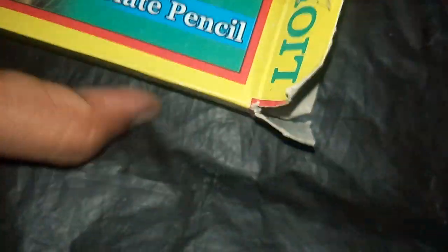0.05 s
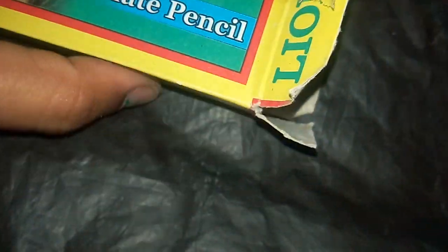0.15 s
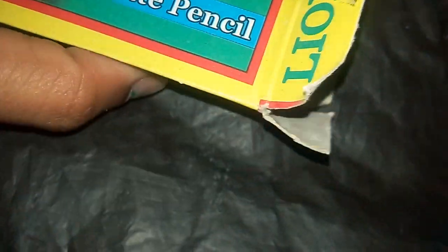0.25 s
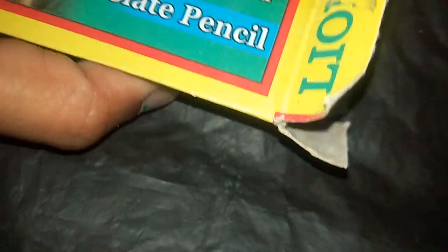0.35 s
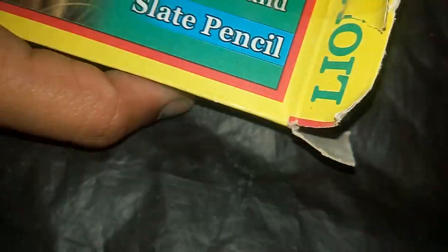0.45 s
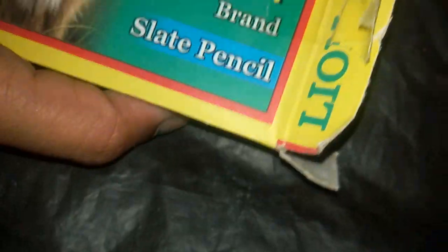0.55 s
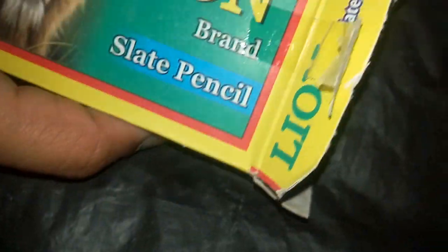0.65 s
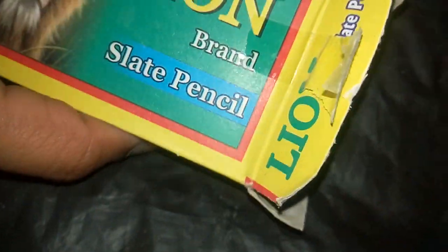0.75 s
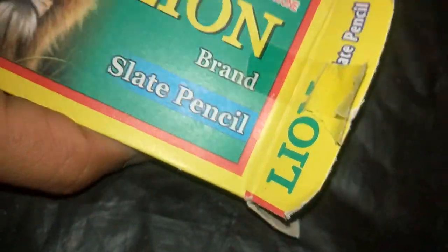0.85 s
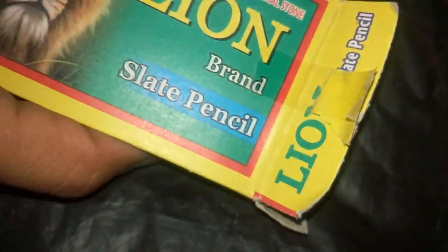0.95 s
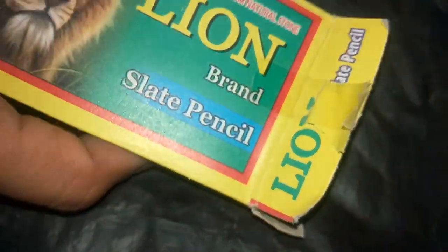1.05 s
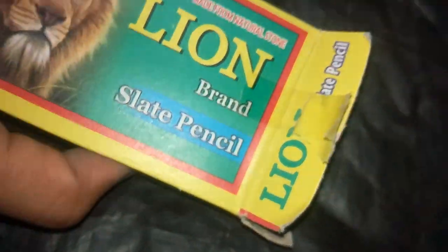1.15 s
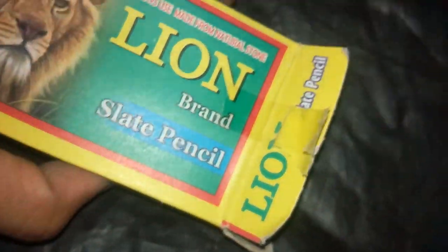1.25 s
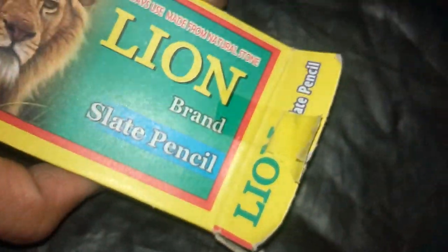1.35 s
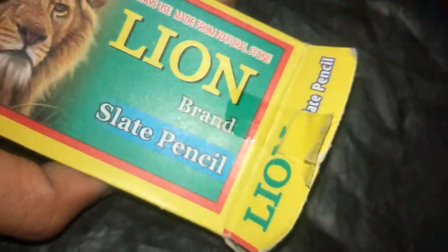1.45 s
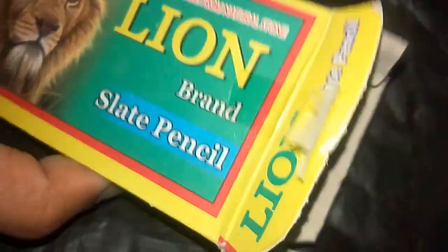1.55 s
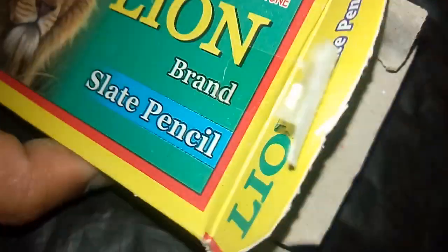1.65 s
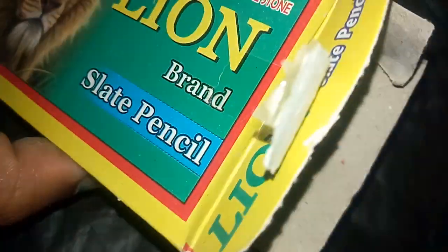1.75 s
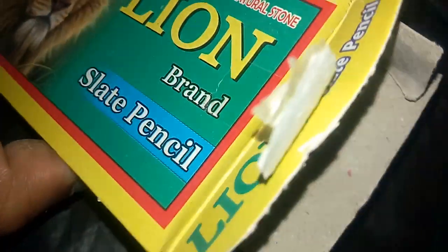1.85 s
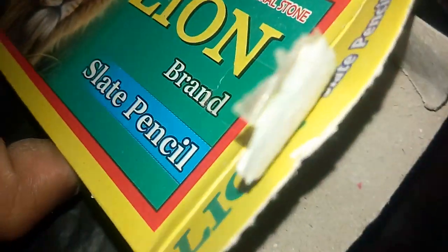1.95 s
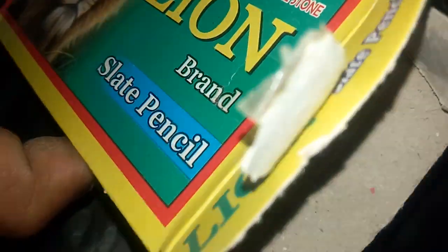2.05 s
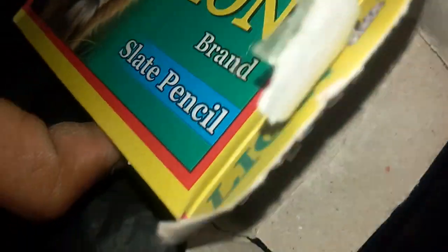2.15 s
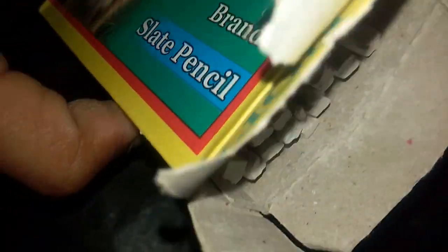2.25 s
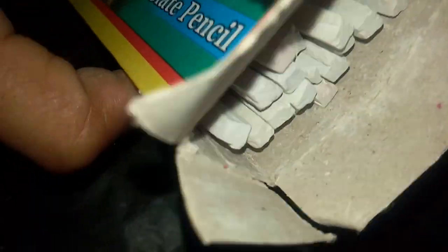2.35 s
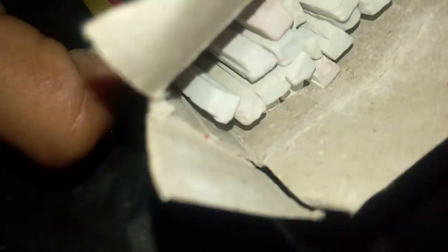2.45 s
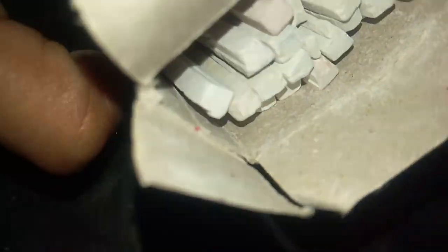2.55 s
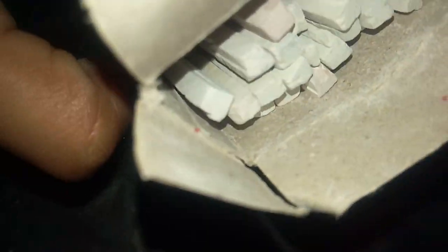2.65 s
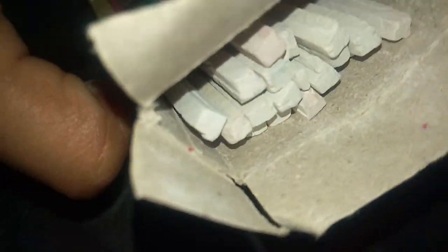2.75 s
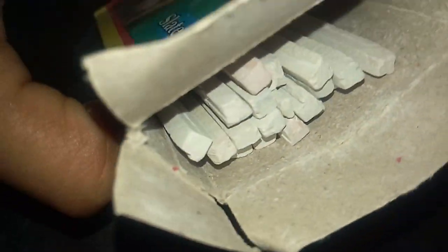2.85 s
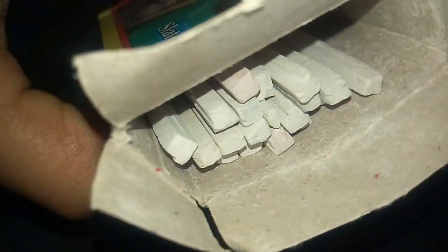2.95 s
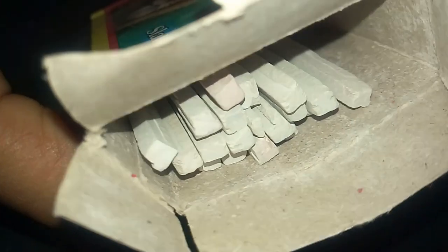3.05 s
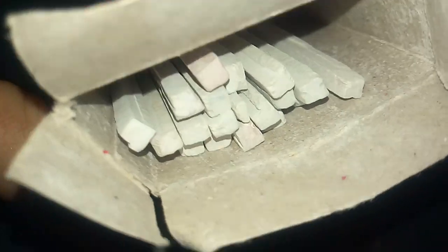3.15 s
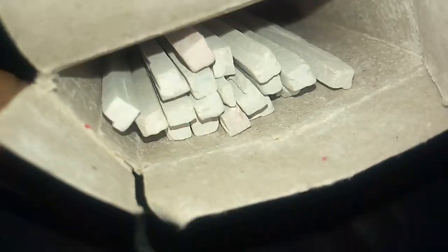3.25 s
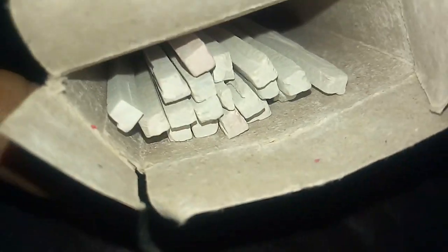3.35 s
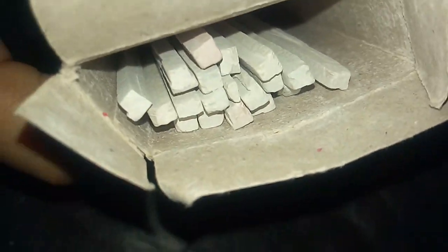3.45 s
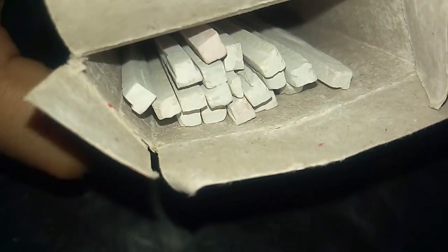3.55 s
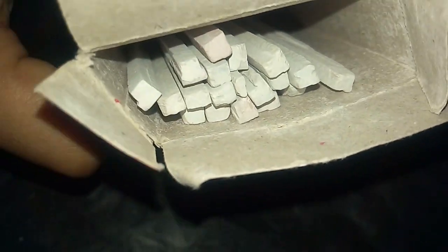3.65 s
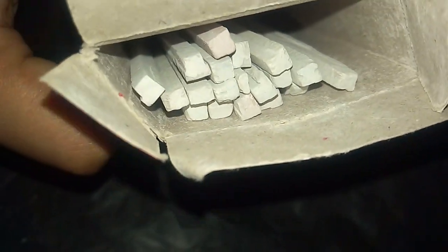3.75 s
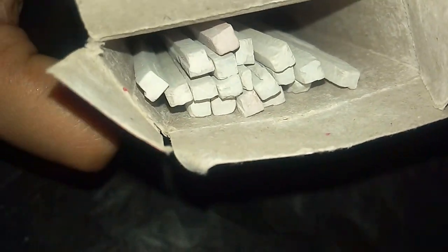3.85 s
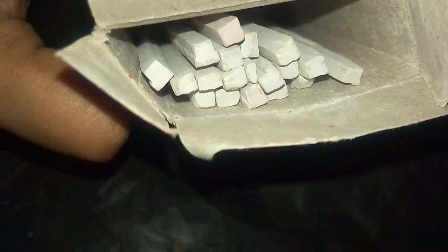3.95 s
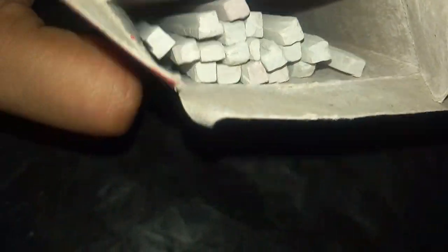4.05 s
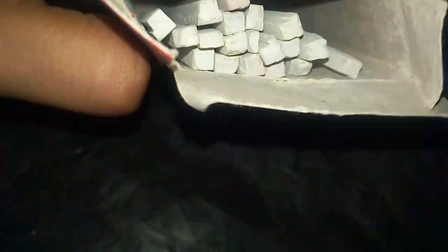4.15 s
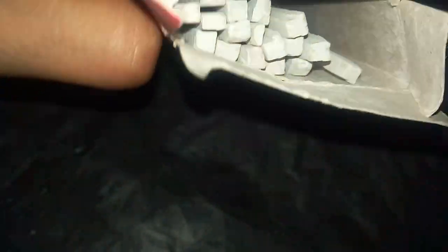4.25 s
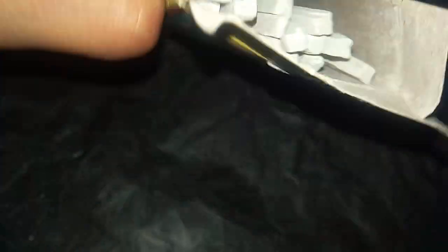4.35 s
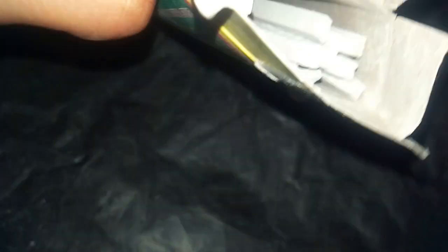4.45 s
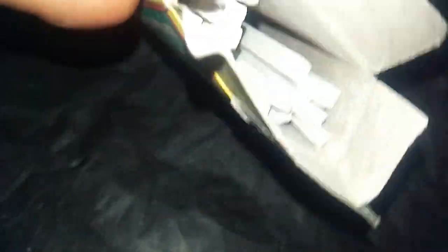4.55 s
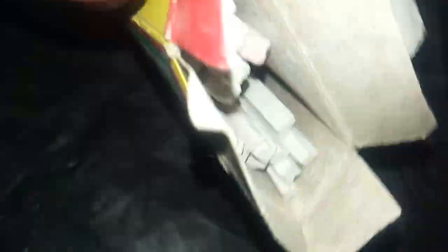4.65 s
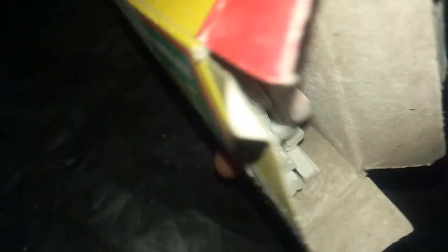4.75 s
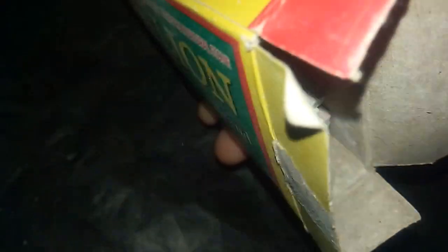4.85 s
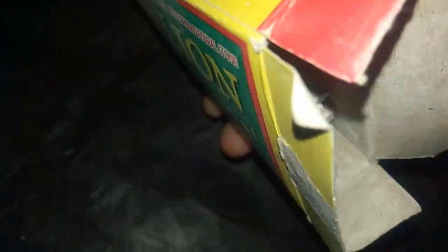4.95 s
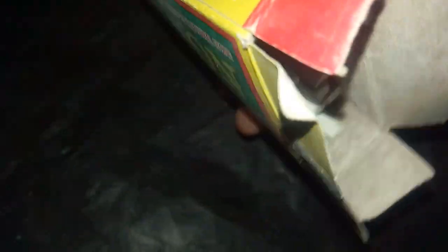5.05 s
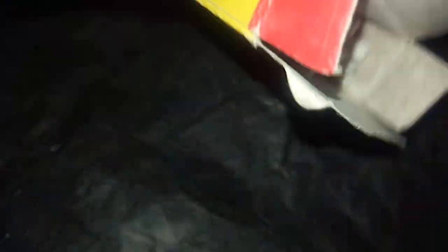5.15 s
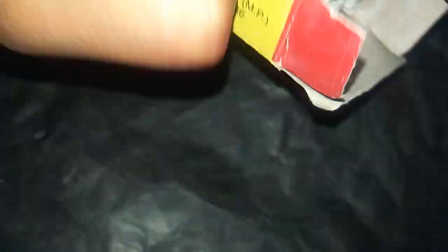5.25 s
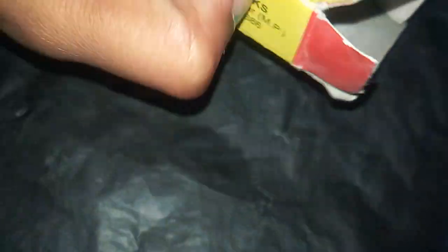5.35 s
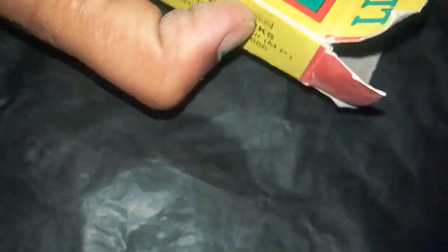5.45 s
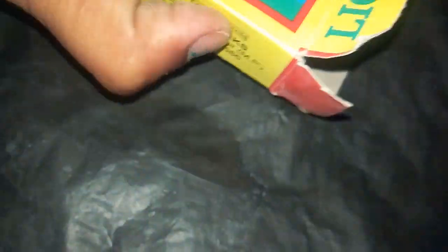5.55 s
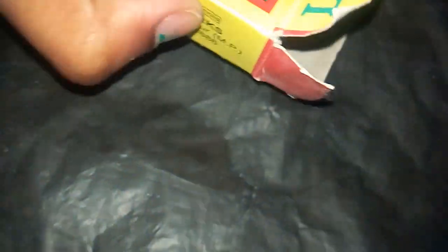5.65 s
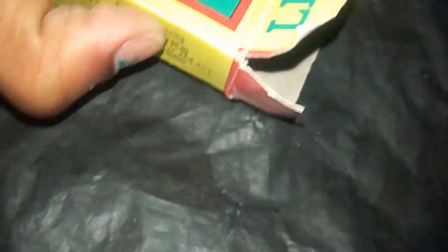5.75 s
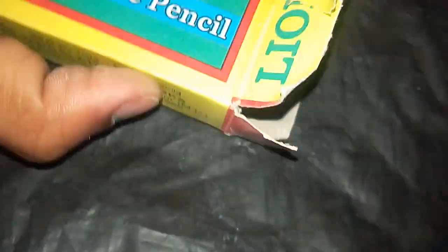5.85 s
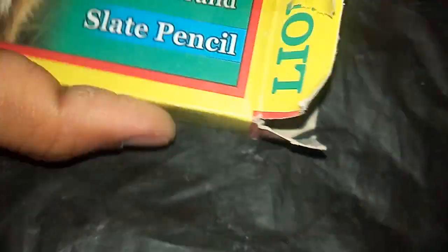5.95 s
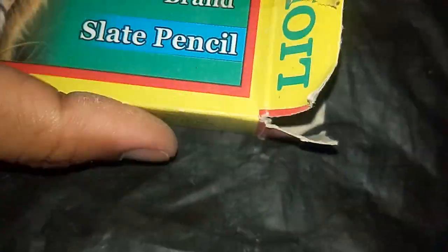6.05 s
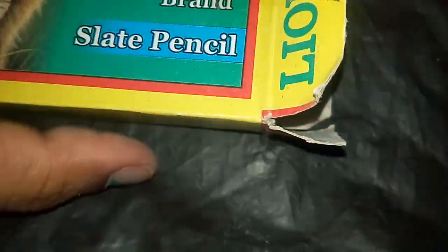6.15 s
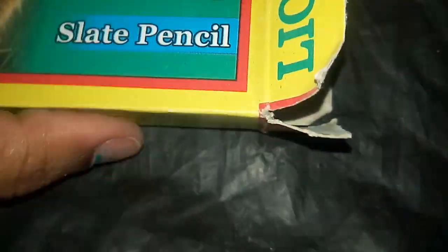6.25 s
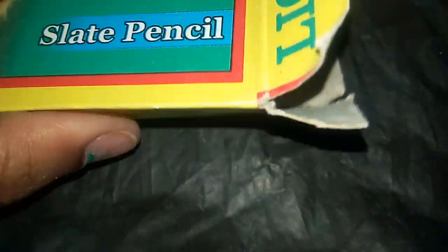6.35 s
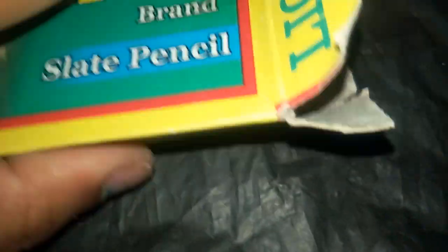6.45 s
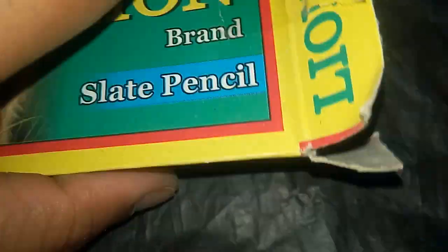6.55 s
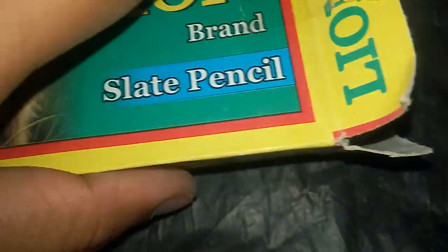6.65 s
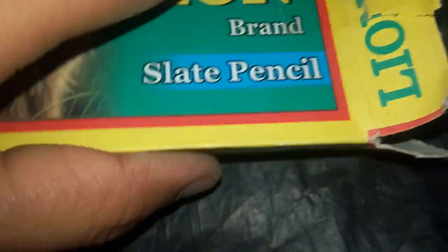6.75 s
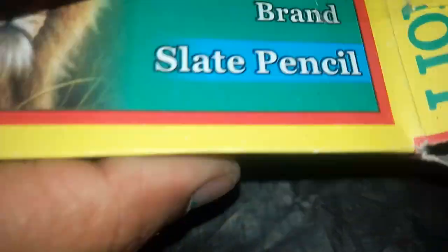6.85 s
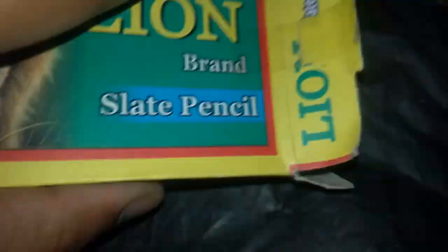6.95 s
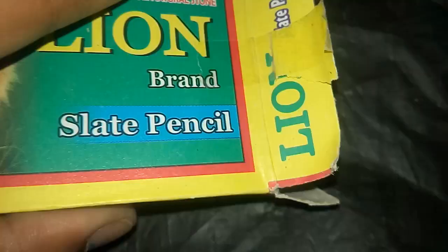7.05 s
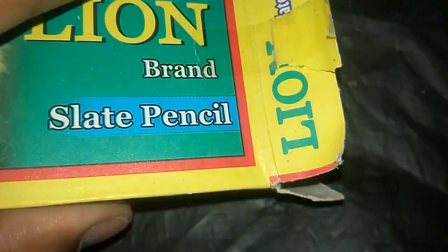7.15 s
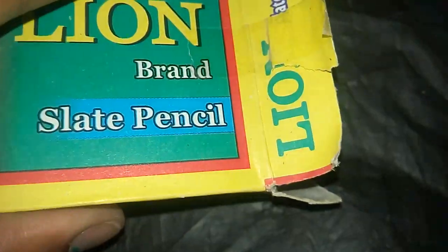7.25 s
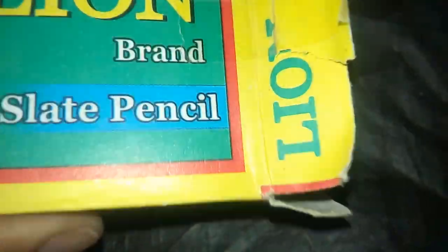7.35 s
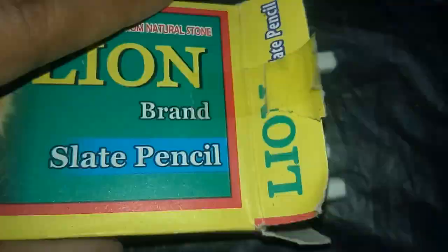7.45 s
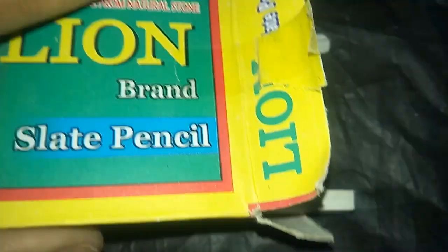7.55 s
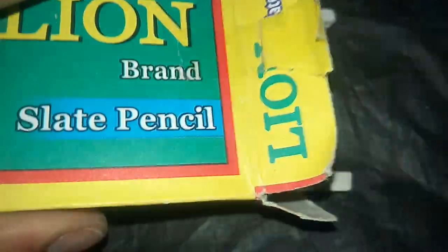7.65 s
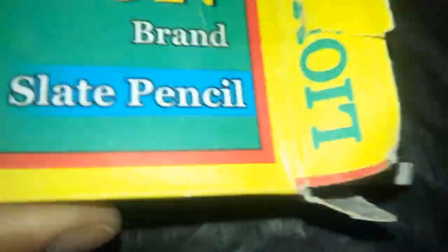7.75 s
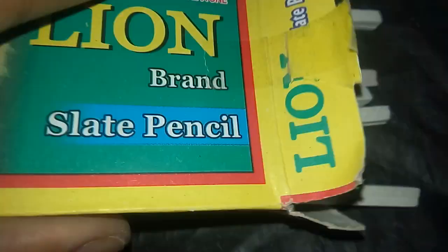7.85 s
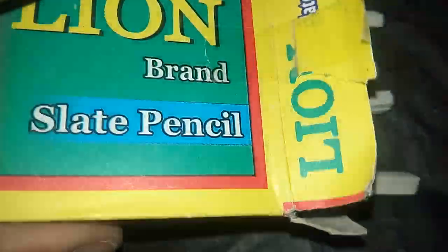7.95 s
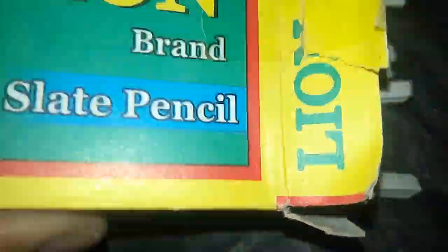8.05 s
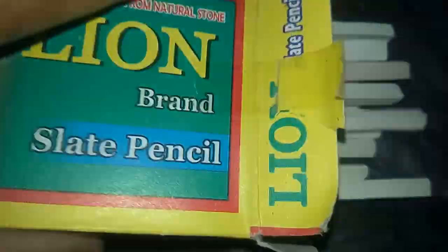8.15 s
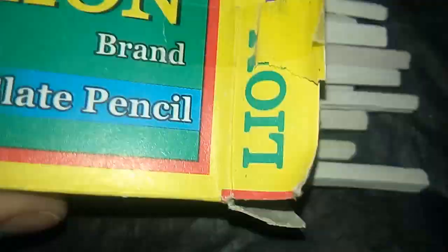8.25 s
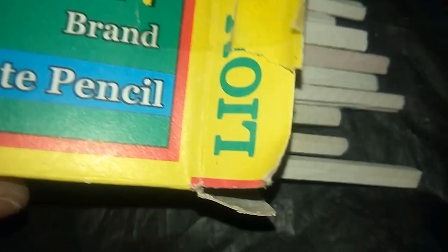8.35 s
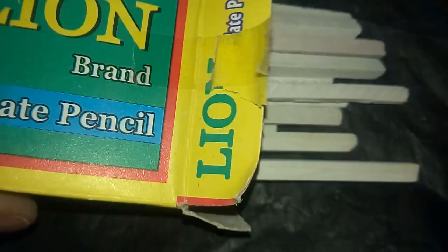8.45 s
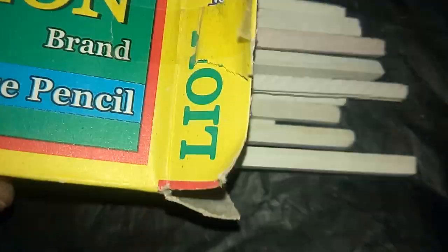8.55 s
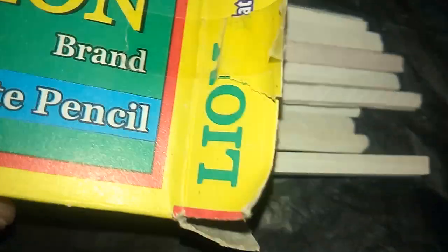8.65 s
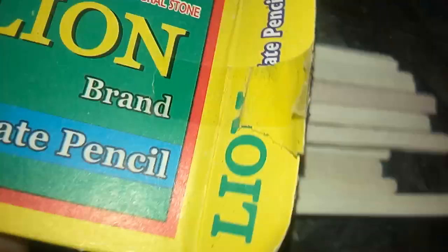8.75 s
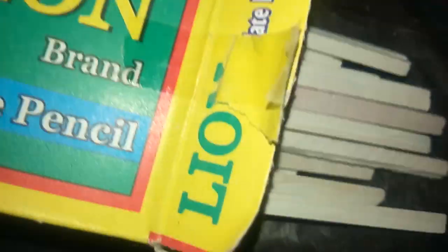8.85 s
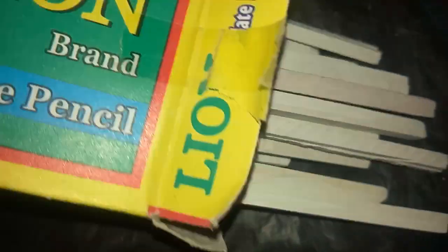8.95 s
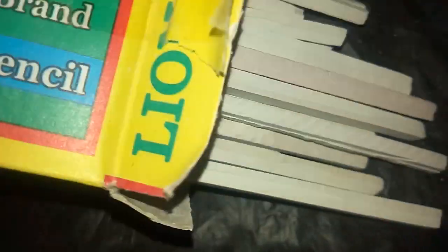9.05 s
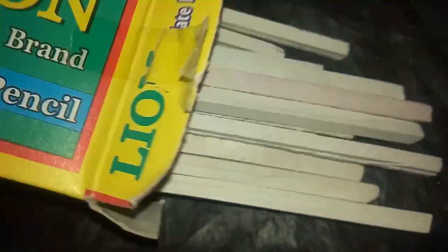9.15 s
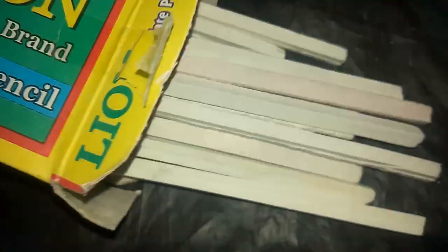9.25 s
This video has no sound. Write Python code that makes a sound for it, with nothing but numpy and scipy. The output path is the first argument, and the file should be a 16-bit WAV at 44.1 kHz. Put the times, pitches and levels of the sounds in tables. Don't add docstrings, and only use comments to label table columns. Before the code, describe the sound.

Close stereo sound over a faint steady hiss, the box weighted to the left in its lower tones. From 0 to 2.6 s fingers rub card and plastic in fine, dry, uneven crackles, with little ticks and hollow pops near 0.5, 0.9 and 1.7 s and a very faint squeak of a peeling flap. Low muffled booms roll from outside at about 1.4 and 1.8 s, fading by 2.5. From 2.6 to 4 s it is nearly quiet, with a few isolated ticks. At 4.4-5.3 s the box turns over: stone sticks slide brightly, with crisp snaps around 4.75 and 5.25. Softer sliding, pops and knocks follow until 6.9 s. Then shakes slam the bunch at about 7.0, 7.5, 7.9, 8.2 and 8.5 s, loudest from 7.5 to 8.2: short hard clatters with boxy thuds. Lighter slides and clicks continue past 9 s.

```python
import sys
import numpy as np
from scipy import signal
from scipy.fft import rfft, irfft
from scipy.io import wavfile
from scipy.ndimage import uniform_filter1d, map_coordinates

SR = 44100
rng = np.random.default_rng(int(sys.argv[2]) if len(sys.argv) > 2 else 0)


def unload_wav(signal):
    wavfile.write(
        sys.argv[1],
        SR,
        np.round(np.clip(np.atleast_2d(signal).T, -1, 1) * 32767).astype(np.int16),
    )


def voltage_ratio(level):
    return 10 ** (np.asarray(level, float) / 20)


N = 409248


def rms_one(x):
    return x / np.sqrt(np.mean(x ** 2) + 1e-20)


def at_hz(points, hz):
    point_hz, value = np.array(points)[:, :2].T
    return np.interp(np.log(hz + 1), np.log(point_hz + 1), value)


def drift(rate_hz):
    step, settle = 40, 2000
    r = np.exp(-2 * step * np.pi * rate_hz / SR)
    chance = rng.standard_normal(N // step + settle + 2)
    slow = rms_one(signal.lfilter([1], [1, -2 * r, r * r], chance)[settle:])
    return np.interp(np.arange(N) / step, np.arange(len(slow)), slow)


def band(x, low_hz, high_hz):
    return signal.sosfilt(signal.butter(3, [low_hz, high_hz], "band", fs=SR, output="sos"), x)


def resonance(x, hz, width_hz):
    r = np.exp(-np.pi * width_hz / SR)
    gain = np.sqrt((1 - r * r) / 2)
    return signal.lfilter(gain * np.array([1, 0, -1]), [1, -2 * r * np.cos(2 * np.pi * hz / SR), r * r], x + 1e-18)


def grains(per_s, spread_db):
    size_db = spread_db * np.minimum(rng.exponential(1, N), 4)
    sizes = voltage_ratio(size_db) * rng.choice([-1, 1], N)
    return rms_one(sizes * (rng.random(N) < per_s / SR))


def swells(rows, shares, fades, roundness):
    out = np.zeros((len(fades), N))
    fades = np.array(fades)[:, None]
    for s, peak_db, weight_db, rise, fall in rows:
        first = max(int((s - 4 * rise) * SR), 0)
        last = min(int((s + 4 * fall) * SR), N)
        near = np.arange(first, last)
        away = np.where(near / SR < s, (s - near / SR) / rise, (near / SR - s) / fall)
        share_db = np.array(shares(peak_db, weight_db))[:, None]
        out[:, near] += voltage_ratio(peak_db + share_db - 20 * fades * away ** roundness)
    return out


# frequency in Hz, left-right likeness from -1 to 1.
LIKENESS = [(60, 0.92), (240, 0.58), (950, 0.0056), (3770, -0.15), (15000, 0.35)]


def diffuse(spectrum, source):
    hz = np.fft.rfftfreq(N, 1 / SR)
    alike = np.clip(at_hz(LIKENESS, hz), -1, 1)
    mid, side = rfft(source)
    pair = np.sqrt(1 + alike) * mid + np.sqrt(1 - alike) * side * [[1], [-1]]
    return rms_one(irfft(pair * voltage_ratio(at_hz(spectrum, hz)), N))


# frequency in Hz, level in dB per Hz.
AIR_COLOUR = [(12, -46), (20, -16), (70, 0.5), (307, -11), (552, -1), (671, -12.5), (1470, -10),
              (3030, -3.5), (5430, -11), (8030, -23.5), (14000, -36), (15700, -57)]


def hiss():
    level_db, lean_db = -62, -3
    air = voltage_ratio(level_db + 0.09 * drift(1.9)) * diffuse(AIR_COLOUR, rng.standard_normal((2, N)))
    return air * voltage_ratio(lean_db / 2 * np.array([[1], [-1]]))


# frequency in Hz, level in dB per Hz.
RUSTLE_COLOUR = [(88, -22), (150, -1.5), (668, -7.5), (827, -9), (1220, -10.5), (1630, -2), (2100, 0),
                 (2410, 0.5), (5230, -5.5), (6470, -3), (8010, -16.5), (13500, -28), (15500, -29)]
# firmest moment in seconds, bright part in dB,
# lows relative to the bright part in dB, build-up in seconds, die-away in seconds.
RUBS = [(0.13, -47.5, -9, 1.2, 0.15), (0.32, -52.5, -19, 0.077, 0.14), (0.45, -56.5, 0.5, 0.22, 0.23),
        (0.713, -50, -12, 0.23, 0.12), (0.89, -51, -7.5, 0.24, 0.074), (1.25, -56.5, -13.5, 0.86, 0.36),
        (1.53, -61.5, 4, 0.21, 0.16), (1.651, -47.5, -1, 0.074, 0.061), (1.85, -51.5, -7, 0.44, 0.5),
        (2.225, -50.5, -17, 0.065, 0.13), (2.325, -51, -2, 0.048, 0.071), (2.44, -55, -7.5, 0.073, 0.1),
        (2.584, -64, 5, 0.11, 0.18), (3.2, -87, 14, 0.55, 0.93)]


def rustle():
    def shares(db, low_db):
        return [low_db, -0.6 * (db + 59.5), 0, -10 + 1.1 * (db + 52.0)]

    rub = swells(RUBS, shares, [1.05, 0.66, 1.17, 1.83], roundness=1.69)
    crackle = diffuse(RUSTLE_COLOUR, [grains(9000, 2.8), grains(9000, 1.7)])
    t = np.arange(N) / SR
    peeling = (t > 1.38) & (t < 2.32)
    singing = rms_one(sum(resonance(crackle, hz, width_hz=18) for hz in (2870, 3310)))
    squeak = peeling * voltage_ratio(-60 + 3 * drift(5)) * singing
    mix = 0
    for level, edges in zip(rub, ((230, 1300), (1300, 3500), (3500, 7500), (7500, 15500))):
        mix = mix + rms_one(band(crackle, *edges)) * level * voltage_ratio(1.2 * drift(7.4))
    return voltage_ratio(1.0 * drift(28)) * mix + squeak


def soft_blows(events, rise_s, decay_s, rough):
    out, t = np.zeros(N + SR), np.arange(SR // 4) / SR
    shape = (1 - np.exp(-t / rise_s)) * np.exp(-t / decay_s)
    for s, peak_db, hz in events:
        chance = rng.standard_normal(len(t))
        tone = np.sin(2 * np.pi * hz * t) + rough * resonance(chance, hz, hz / 2)
        out[round(s * SR):][:len(t)] += voltage_ratio(peak_db) * shape * tone
    return out[:N]


# start in seconds, peak in dB, ring in Hz.
THUMPS = [(0.021, -49.5, 154), (0.118, -50.5, 107), (0.479, -57, 97), (2.5, -48, 95), (3.558, -55.5, 80),
          (4.495, -46, 144), (4.847, -31, 153), (5.258, -56, 120), (6.06, -50, 150), (7.001, -37.5, 187),
          (7.538, -36, 130), (7.931, -35, 177), (8.216, -32, 184), (8.551, -34, 103), (8.678, -51, 202)]
# start in seconds, peak in dB, ring in Hz.
POPS = [(0.138, -46, 877), (0.469, -35.5, 950), (0.506, -41.5, 884), (0.87, -44, 730), (1.659, -39.5, 815),
        (1.945, -41.5, 620), (4.54, -39, 775), (5.447, -40.5, 870), (5.859, -50.5, 835),
        (6.022, -42.5, 904), (6.254, -41.5, 800), (6.301, -31.5, 734), (6.361, -47, 830),
        (6.537, -38.5, 950), (6.929, -38, 950), (6.979, -35, 820), (7.496, -37, 480), (7.695, -22, 464)]


def card_walls():
    thumps = soft_blows(THUMPS, 0.022, 0.019, rough=1.65)
    return thumps + soft_blows(POPS, 0.0028, 0.0078, rough=0.98)


# start in seconds, peak in dB, ring in Hz.
SNAPS = [(0.1795, -29.5, 2460), (1.8583, -30, 1680), (4.5174, -39, 4900), (4.7295, -20.5, 5070),
         (4.7674, -16.5, 6320), (4.7733, -12.5, 6400), (4.8326, -29, 4770), (5.258, -16, 5430),
         (5.3147, -27.5, 6170), (6.5014, -32.5, 6300), (6.571, -30.5, 1700), (8.526, -30, 1670),
         (8.6825, -44.5, 1600), (8.7227, -36, 4960), (8.7497, -28.5, 5100)]
# start in seconds, peak in dB, ring in Hz.
TICKS = [(0.4704, -30.5, 3560), (0.4844, -31, 2220), (0.8706, -24.5, 1850), (1.6714, -29, 1700),
         (2.59, -33, 6450), (2.771, -24.5, 4600), (3.4017, -44, 2230), (4.0814, -32, 5400),
         (4.11, -33.5, 1590), (4.4386, -27, 5560), (4.5043, -21, 5030), (5.3708, -26.5, 6430),
         (5.4444, -29, 5700), (5.5074, -39, 6220), (5.5237, -43, 5240), (5.7658, -43, 2400),
         (2.772, -37, 1510), (4.26, -37, 4900), (6.21, -40, 2200), (6.72, -54, 2500), (7.195, -44, 1660),
         (7.27, -46, 2280), (6.2517, -27.5, 3670), (6.6625, -30, 2420), (6.9314, -36, 5900),
         (7.8014, -20, 1690), (8.093, -30.5, 1900), (8.3643, -35, 5100), (8.51, -23, 2500),
         (8.8767, -19.5, 5900)]
# start in seconds, peak in dB, ring in Hz.
KNOCKS = [(0.476, -36, 2070), (0.4958, -30, 1860), (0.5057, -29.5, 1470), (1.6596, -27, 5350),
          (1.946, -36.5, 2840), (2.0096, -33, 2840), (2.3144, -40, 2360), (2.3255, -33, 1830),
          (2.8908, -43, 2280), (4.5408, -18, 3980), (4.5454, -20, 1620), (5.244, -30, 6140),
          (6.2651, -27, 1560), (6.3004, -22, 2600), (6.3634, -34.5, 1820), (6.536, -30.5, 2630),
          (6.8162, -34, 2880), (6.9779, -12, 1920), (7.4959, -10.5, 4300), (7.6675, -28, 2440),
          (7.6945, -13, 2500), (7.7194, -25.5, 2370), (7.7324, -23, 2530), (7.7911, -17, 5700),
          (8.0416, -31, 1940), (8.105, -27.5, 1670), (9.0644, -26, 6060), (9.2025, -30.5, 2420),
          (9.216, -22.5, 6150)]
# box relative to peak in dB, top relative to peak in dB, contact in seconds.
SNAP = (-11, -4.5, 0.0013)
TICK = (-17, -25, 0.0013)
KNOCK = (-4, -54, 0.0018)


def knocks():
    size = 400
    t = np.arange(size) / SR
    kinds = ((TICKS, TICK), (KNOCKS, KNOCK), (SNAPS, SNAP))
    blows = [(*row, *kind) for rows, kind in kinds for row in rows]
    force, rings = np.zeros((2, 4, N + size)), np.zeros((2, N + size))
    for s, peak_db, hz, box_db, top_db, contact_s in blows:
        draw = rng.standard_normal(size)
        pan_db = 2.7 * draw[-1]
        sides = voltage_ratio([[pan_db / 2], [-pan_db / 2]])
        at = round(s * SR)
        burst = np.abs(draw).clip(0.6) * np.sign(draw) * np.exp(-t / contact_s)
        brighter_db = 8.6 * np.log2(hz / 3300)
        shares = voltage_ratio(np.array([[box_db], [min(-brighter_db, 0)], [min(brighter_db, 0)], [top_db]]))
        force[:, :, at:at + size] += sides[:, :, None] * voltage_ratio(peak_db - 11) * shares * burst
        rings[:, at:at + size] += sides * voltage_ratio(peak_db - 7.5) * resonance(burst, hz, width_hz=150)
    return force[:, :, :N], rings[:, :N]


def body(force, modes, low_hz, high_hz, broad_db, uneven):
    def uneven_force():
        return 1 + uneven * rng.standard_normal(N)

    weights = voltage_ratio(np.array(modes)[:, 2])
    grip = voltage_ratio(3.5 * drift(6))
    rings = 0
    for weight, (hz, width_hz, _) in zip(weights, modes):
        drive = force * np.roll(grip, rng.integers(N)) * uneven_force()
        rings = rings + weight * resonance(drive, hz, width_hz)
    crack = band(force * uneven_force(), low_hz, high_hz) * np.sqrt(SR / 2 / (high_hz - low_hz))
    return (rings / np.sqrt(np.sum(weights ** 2)) + voltage_ratio(broad_db) * crack) / np.sqrt(1 + uneven ** 2)


# frequency in Hz, width in Hz, level in dB.
BOX = [(137, 130, -2), (338, 154, 12.5), (497, 77, 5), (648, 124, 5.5), (810, 57, 7.5), (974, 61, 3.5)]
STICKS_DEEP = [(1680, 65, 3.5), (1900, 22, -4.5), (2333, 35, -2.5), (2597, 190, 10), (2998, 255, 7)]
STICKS_BRIGHT = [(4010, 620, 18.5), (4750, 200, 12.5), (5120, 30, -28), (5350, 47, 4), (5925, 57, 10.5),
                 (6250, 150, -65), (7420, 150, -17), (7850, 54, -16)]
TOP = [(8740, 2040, 19), (11700, 970, 14)]


def sticks_in_box(force):
    box = body(force[0], BOX, 133, 1840, broad_db=-13.5, uneven=1.0)
    deep = body(force[1], STICKS_DEEP, 1300, 3700, broad_db=0, uneven=0.9)
    bright = body(force[2], STICKS_BRIGHT, 3500, 7500, broad_db=0, uneven=0.9)
    top = body(force[3], TOP, 9700, 21500, broad_db=-10.5, uneven=1.0)
    return box + deep + bright + band(top, 5560, 10800)


# loudest moment in seconds, level in dB,
# upper part relative to level in dB, build-up in seconds, die-away in seconds.
BOOMS = [
    (1.385, -51.5, 8, 0.021, 0.044),
    (1.44, -36.5, 2.5, 0.045, 0.19),
    (1.755, -39.5, 0, 0.038, 0.25),
    (1.96, -52.5, -4, .03, 0.21),
    (2.2, -54.5, -12, 0.31, 0.39),
]


def booms():
    low_level, upper_level = swells(BOOMS, lambda db, upper_db: [0, upper_db], [1, 1.3], roundness=1.49)
    rolls, later = grains(1500, 1.5), grains(1500, 1.5)
    low = rms_one(band(rolls, 105, 290) + voltage_ratio(-5) * resonance(rolls, 152, width_hz=20))
    upper = rms_one(band(later, 220, 580) + voltage_ratio(-27) * band(rolls, 580, 1050))
    return low_level * low + upper_level * upper


# fastest moment in seconds, bright modes in dB,
# box relative to bright in dB, build-up in seconds, die-away in seconds.
TURN_SLIDES = [(4.096, -51.5, -9.5, 0.014, 0.079), (4.22, -62, -12, 0.16, .2),
               (4.455, -39, -19, 0.11, 0.18), (4.63, -55, -7.5, 0.25, 0.24), (4.87, -37, -13, 0.19, 0.051),
               (5.015, -54.5, -18, 0.1, .025), (5.09, -58.5, -50, 0.013, 0.13),
               (5.263, -53.5, -18, 0.061, 0.23), (5.55, -48.5, -14, 0.42, 0.15),
               (5.772, -78, 11.5, 0.22, 0.07), (5.88, -53.5, -12, 0.029, 0.18),
               (6.031, -49.5, -18, 0.076, 0.075), (6.266, -56.5, -2.5, 0.24, 0.28),
               (6.465, -48, -6, 0.083, 0.17), (6.8, -58, -1, 0.36, 0.29)]
SHAKE_SLIDES = [(7.0, -42.5, -1.5, 0.06, 0.13), (7.12, -55, -10, .07, 0.062), (7.419, -58, 2, 0.05, 0.052),
                (7.56, -42.5, -0.5, 0.083, 0.15), (7.712, -54, 8, 0.035, 0.041),
                (7.8, -49, 0.5, 0.043, 0.022), (7.902, -35, -1.5, 0.049, 0.12),
                (8.199, -46.5, -3.5, 0.078, 0.6), (8.329, -49, 3.5, 0.24, 0.027),
                (8.45, -52, -14, 0.033, 0.029), (8.538, -38.5, -4, 0.054, 0.08),
                (8.611, -43, -11, 0.04, .045), (8.73, -55.5, -2.5, 0.14, 0.08),
                (8.877, -41, -7.5, 0.08, 0.16), (9.113, -40.5, -7, 0.11, 0.051),
                (9.24, -44.5, 1.5, 0.045, 0.12)]
# moment in seconds, peak in dB, box relative to peak in dB,
# build-up in seconds, die-away in seconds.
SLAMS = [(4.4787, -31, -12, 0.039, 0.038), (4.8664, -20.5, -10, 0.037, 0.023),
         (6.0414, -32.5, -12, 0.038, 0.052), (6.9944, -20, -25, 0.064, 0.029),
         (7.0354, -17, -4, 0.024, 0.029), (7.0514, -15, -17, 0.0095, 0.025),
         (7.5135, -16.5, -7, 0.0072, 0.022), (7.5406, -2, -11, 0.0044, 0.024),
         (7.5498, -3.5, -18, 0.019, .0073), (7.5814, -17.5, -8.5, 0.039, 0.022),
         (7.9124, -16.5, -15, 0.026, 0.03), (7.9287, 0.5, -8.5, 0.0066, .016),
         (8.2, -13.5, -9, 0.01, 0.023), (8.2261, -1.5, -6, 0.013, 0.029), (8.543, -12, -7, 0.011, 0.0099),
         (9.0874, -31, -12, 0.044, 0.061), (9.249, -27.5, -20, 0.036, 0.035)]


def contact_forces():
    def slide_shares(db, box_db):
        return [box_db, 2.5 + 0.66 * box_db, 0, -8.5 + 0.61 * (db + 41.0)]

    slides = swells(TURN_SLIDES + SHAKE_SLIDES, slide_shares, [0.82, 0.91, 1.11, 1.2], roundness=1.48)
    slams = swells(SLAMS, lambda db, box_db: [box_db, -3, 0, -7], [0.79, 0.96, 1.02, 1.4], roundness=1.16)
    flutter_db = 1.71 * drift(35) + [[0], [0], [0], [3]] * drift(11)
    strength = slides * voltage_ratio(-3.5 + flutter_db) + slams * voltage_ratio(-13.5)
    fine_grit, sparse_ticks = grains(6000, 3.5), grains(220, 3.0)
    return strength * (fine_grit + voltage_ratio(-4) * sparse_ticks)


def gripped(near):
    held = np.arange(N) / SR < 6.9
    loss_db, below_hz, lean_db = -8.5, 504, -0.5
    low, high = (signal.sosfilt(signal.butter(2, below_hz, kind, fs=SR, output="sos"), near)
                 for kind in ("low", "high"))
    return (high - low * voltage_ratio(loss_db * held)) * voltage_ratio(lean_db / 2 * held * [[1], [-1]])


# frequency in Hz, left-right level in dB.
NEAR_BALANCE = [(60, 7), (110, 8), (200, 16), (380, 7.5), (700, 7), (1290, 8), (2380, 7.5), (4400, 2.5),
                (8120, -1.5), (15000, 6)]


def microphones(near):
    lead_s, sway_s = 1.5e-4, 3e-5
    hz = np.fft.rfftfreq(N, 1 / SR)
    left, right = irfft(rfft(near) * voltage_ratio(at_hz(NEAR_BALANCE, hz) / 2 * [[1], [-1]]), N)
    read_at = np.arange(N) - SR * (lead_s + sway_s * drift(2.98))
    return np.array([left, map_coordinates(right, [read_at], order=3)])


def scene():
    around = hiss() + rustle()
    card = card_walls()
    blows, rings = knocks()
    force = contact_forces()
    shared = sticks_in_box(force)
    own = np.array([sticks_in_box(force + voltage_ratio(4.5) * side) for side in blows])
    bunch = (shared + own) * voltage_ratio(-5.5)
    return microphones(gripped(bunch + rings) + card) + around + booms()


def thin_top(x, from_hz, keep_db, whim_db):
    frame = dict(fs=SR, window="cosine", nperseg=1024)
    hz, _, lines = signal.stft(x, **frame)
    power, top = np.abs(lines) ** 2, hz > from_hz
    whim = np.repeat(rng.standard_normal((33, power.shape[2])), 16, axis=0)[:len(hz)]
    bar = voltage_ratio(2 * (keep_db + whim_db * whim))
    weak = (power < bar * uniform_filter1d(power, size=24, axis=1)) & top[:, None]
    energy = power[:, top].sum(axis=(0, 1))
    sudden = energy > 3 * signal.medfilt(energy, 9)
    return signal.istft(lines * ~(weak & ~sudden), **frame)[1][:, :N]


def roll_off(x):
    return signal.sosfilt(signal.butter(12, 15830, fs=SR, output="sos"), x)


def record(dry):
    cut = signal.sosfilt(signal.cheby2(10, 50, 15800, fs=SR, output="sos"), dry)
    rounded = 1.156 * np.tanh(cut / 1.235)
    thinned = thin_top(rounded, from_hz=7300, keep_db=2.5, whim_db=3.5)
    return roll_off(thinned)


dry = scene()
out = record(dry)
unload_wav(out)
```